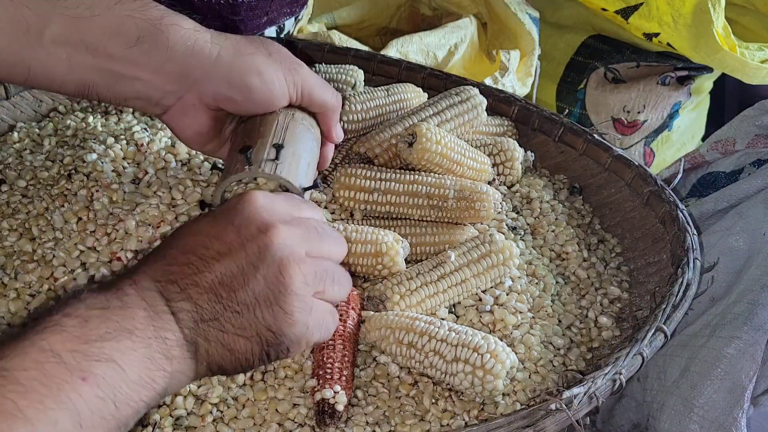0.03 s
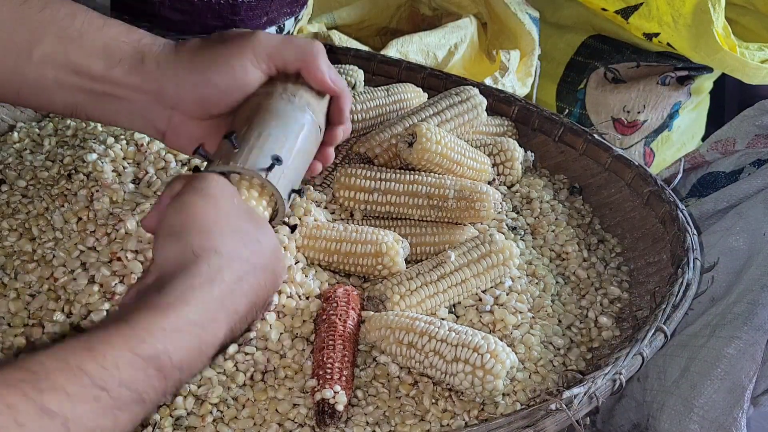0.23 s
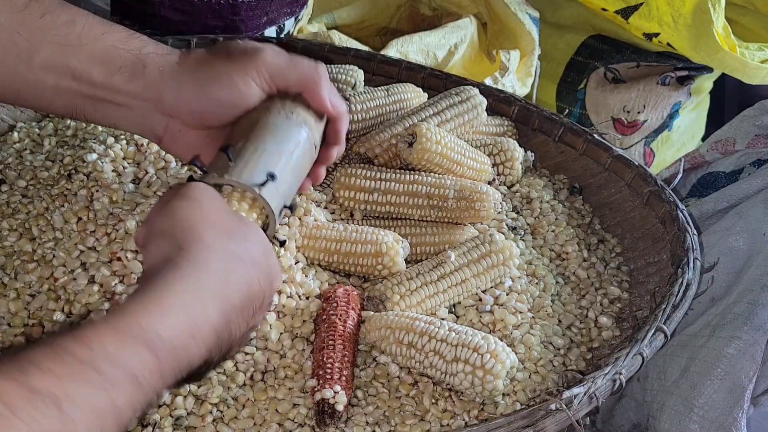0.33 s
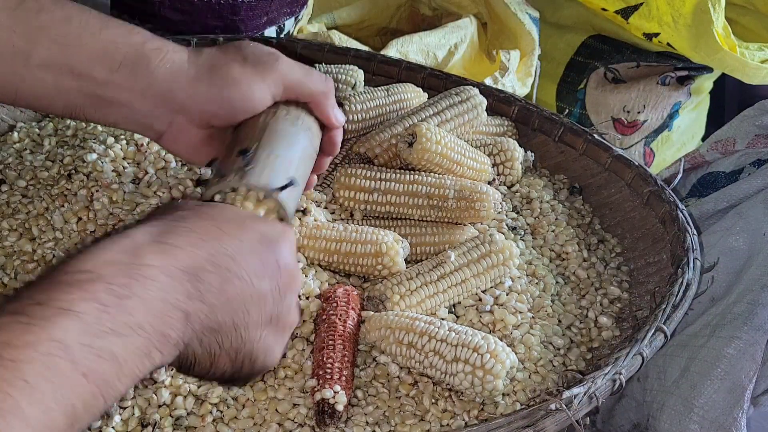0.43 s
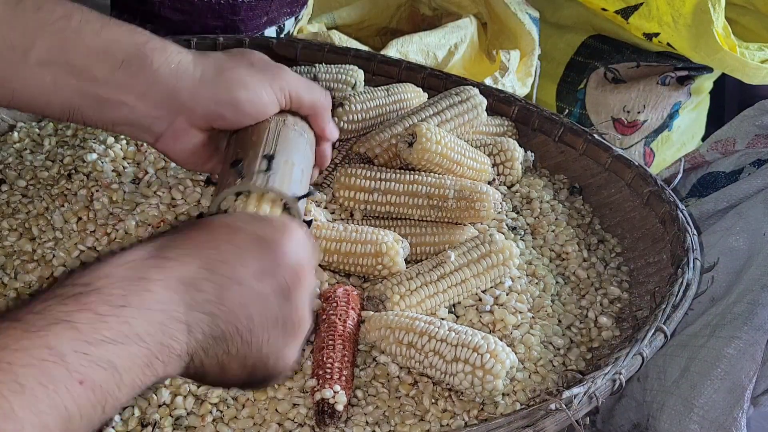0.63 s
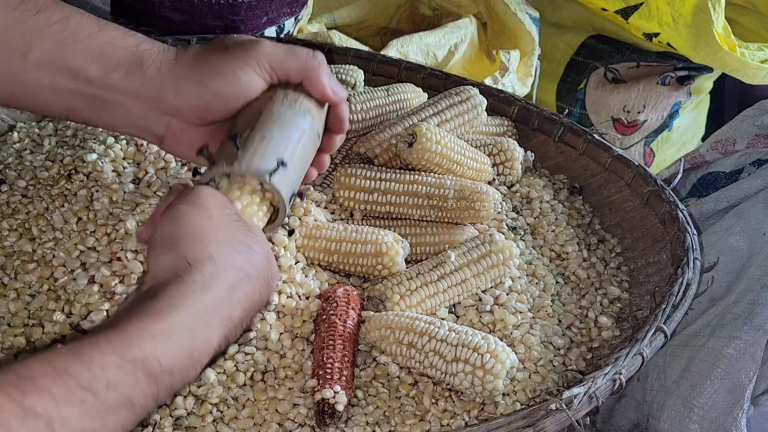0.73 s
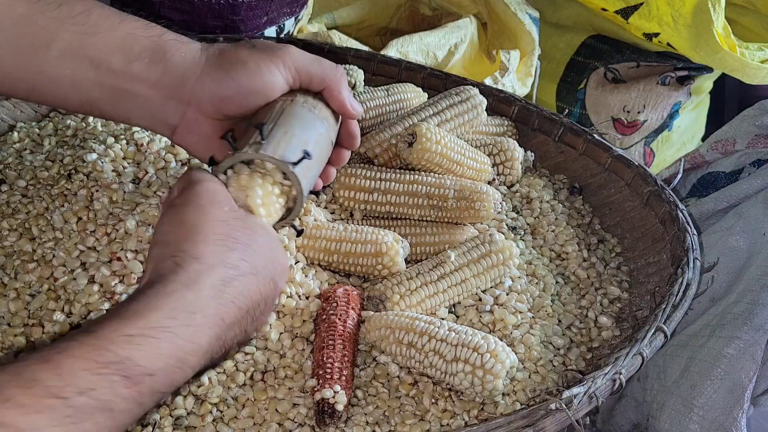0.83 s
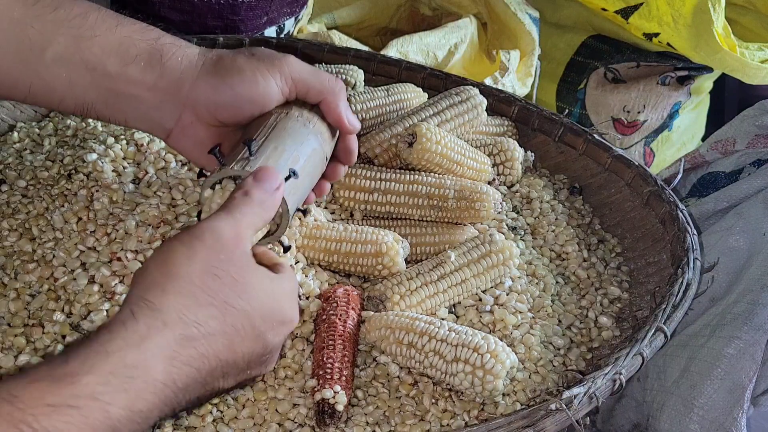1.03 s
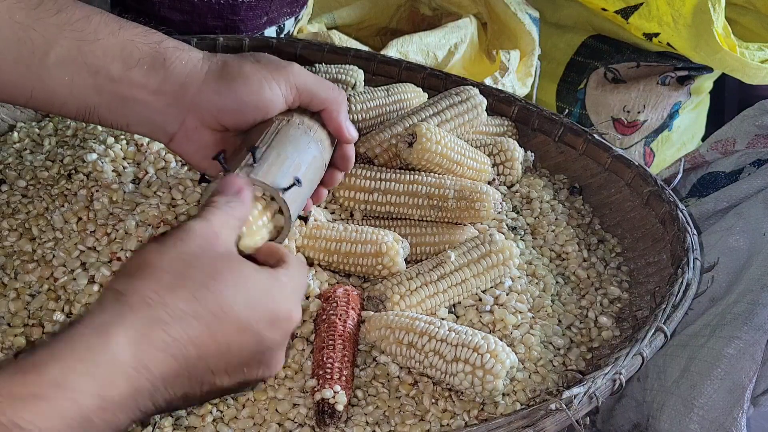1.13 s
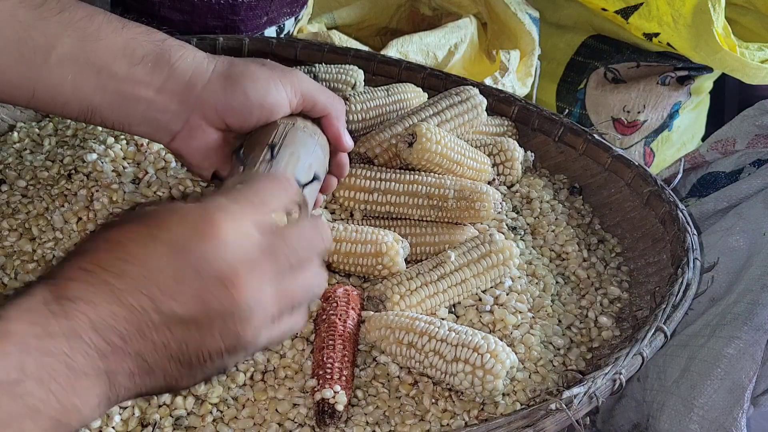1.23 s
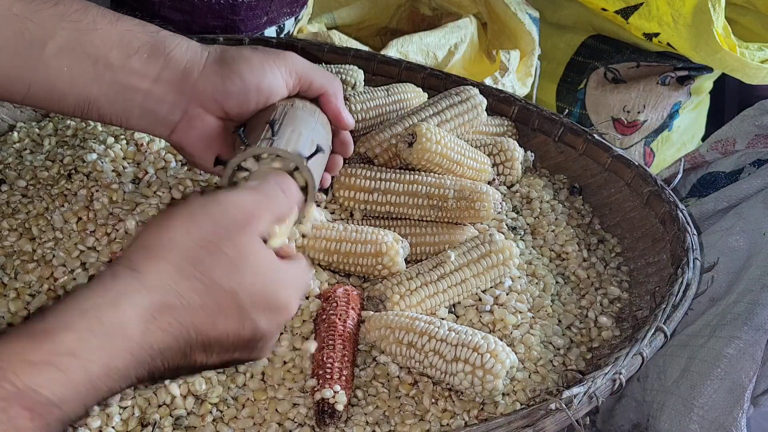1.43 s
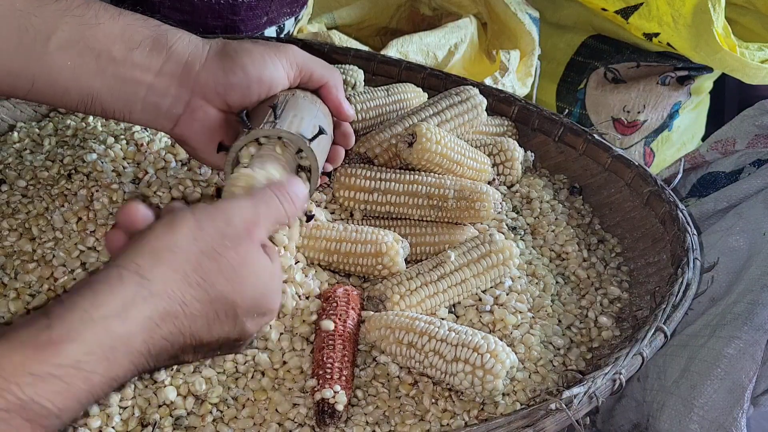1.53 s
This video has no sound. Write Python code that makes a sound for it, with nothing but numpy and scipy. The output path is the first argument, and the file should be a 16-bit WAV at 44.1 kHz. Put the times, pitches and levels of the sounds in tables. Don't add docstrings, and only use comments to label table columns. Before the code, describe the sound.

A dried corn cob is twisted in a wooden sheller, kernels cracking, crunching and ticking down outdoors

```python
import sys
import numpy as np
from scipy import signal
from scipy.fft import rfft, irfft, next_fast_len
from scipy.io import wavfile
from scipy.ndimage import uniform_filter1d, map_coordinates

SR = 44100
rng = np.random.default_rng(int(sys.argv[2]) if len(sys.argv) > 2 else 0)


def master(y):
    cut = np.clip(np.atleast_2d(y).T, -1, 1)
    pcm = np.round(cut * 32767)
    wavfile.write(sys.argv[1], SR, pcm.astype(np.int16))


def field_ratio(decibels):
    return 10 ** (np.asarray(decibels, dtype=float) / 20)


N = 70560

# [Hz, dB per Hz]
TRAFFIC_SPECTRUM = [(15, -39.5), (25, -14.5), (92, -5), (134, -11.5), (173, -17.5), (237, -20), (315, -16),
                    (591, -23.5), (900, -27.5), (1170, -73), (1980, -120)]
# [Hz, Hz, dB]
ENGINE_BANDS = [(83.4, 10.5, 0.5), (105.1, 9.5, -0.5), (176, 33, -10.5), (335.7, 49, -17.5)]
# [Hz, dB per Hz]
AIR_SPECTRUM = [(500, -24.5), (800, -12), (1800, -9.5), (4000, -21.5), (8000, -36), (12000, -33),
                (16000, -37)]
RUMBLE_DB, DRONE_DB, AIR_DB = -51.5, -52.5, -64
HUM_HZ, HUM_DB = 84, -56

# [Hz, s]
YARD_DECAY = [(300, 0.11), (3000, 0.14), (12000, 0.092)]
YARD_DB = -12.5

# [s, dB, dB added per higher mode]
KNOCKS = [
    (0.0243, -40.5, -0.5),
    (0.1234, -42, 4),
    (.2005, -28.5, -14),
    (0.2248, -50, 10),
    (.4708, -35, 5),
    (0.6702, -45, 6),
    (0.7094, -48.5, 7),
    (1.395, -39.5, -12.5),
]
# [Hz, dB, s]
TUBE_MODES = [(352.3, 1.5, 0.077), (814, 2, 0.03), (1164, 1.5, 0.022), (1600, -4.5, 0.034)]

# [Hz, dB per Hz]
CRUNCH_SPECTRUM = [(120, -36.5), (340, -17), (570, -15.5), (1150, -10), (2200, -8), (3000, -3), (5500, -3),
                   (8500, -7.5), (10500, -14.5), (15500, -19.5)]
# [s, dB, dB]
TWISTS = [
    [(0, -46, 8.5), (.018, -48.5, 1), (.03, -36.5, 2.5), (.055, -51, -6), (.085, -60.5, 5),
     (.097, -46.5, 10), (.135, -46, 9), (.15, -37, 10.5), (.168, -40, 0)],
    [(.181, -30, 7), (.197, -33.5, 6), (.212, -32.5, 10), (.228, -25.5, 6.5), (.25, -39.5, 2.5),
     (.31, -61.5, 10.5), (.338, -59, -10), (.36, -50.5, -11), (.44, -49.5, -3.5)],
    [(.466, -39.5, -3), (.473, -28.5, 5.5), (.493, -38, -5), (.514, -55.5, 17.5), (.58, -68.5, 12),
     (.605, -66, -13), (.62, -52, 0), (.66, -48.5, -5)],
    [(.676, -36, 3), (.701, -36.5, -5), (.715, -29, 8.5), (.737, -44, -1), (.785, -72, 13),
     (.87, -63.5, -5.5), (.92, -68, -7.5), (1.08, -73, -2.5)],
]
# [s, dB, dB]
SHIFTS = [
    [(1.117, -56.5, 7.5), (1.125, -44.5, -7), (1.166, -71.5, 17), (1.176, -45, -2.5), (1.208, -58.5, 18),
     (1.22, -46.5, 6), (1.25, -48, 4.5), (1.296, -69, 8), (1.322, -66, 4)],
    [(1.335, -58.5, 6.5), (1.39, -47.5, 11.5), (1.412, -56, 6), (1.438, -51, 14), (1.492, -51, 6),
     (1.54, -66.5, 2), (1.558, -65, 7), (1.58, -49.5, 10), (1.6, -60, 20)],
]
GRAINS_PER_S, GRAIN_SPREAD_DB, GRAIN_HZ, GRAIN_CYCLES = 2800, 4, 3850, 1.56
BED_DB, PATCHY_DB, CLUMP_DB = -7, 2.5, 1.46
BRIGHT_HZ, BODY_HZ, BODY_LOSS = 7600, 1820, 0.4

# [s, dB peak, Hz ring, s, dB over ring]
TICKS = [(0.349, -40.5, 1540, 0.0017, -18), (0.369, -34, 2980, 0.0014, -12), (0.396, -41, 1680, 0.00082, 1),
         (.411, -56, 7000, .001, -3), (0.4193, -35, 5330, 0.002, -14), (0.433, -45, 3000, .0012, -8),
         (0.563, -46.5, 8950, .0014, 3), (0.612, -42, 2600, 0.0016, -6), (0.642, -36, 1300, .0012, -7),
         (.865, -52.5, 6500, 0.0011, 0.5), (1.113, -43, 7200, 0.0013, -15),
         (1.1206, -29.5, 4940, 0.0016, -7), (1.172, -35.5, 4580, 0.0036, -18),
         (1.2187, -38, 3400, 0.0036, -7), (1.23, -37.5, 2960, .003, -12), (1.234, -33, 5270, 0.0024, -21),
         (1.336, -39.5, 13300, 0.0014, 2), (1.3752, -46, 1730, 0.0063, -14), (1.377, -42, 12600, .001, -5),
         (1.395, -42, 3600, 0.0034, -7), (1.4045, -37, 13700, 0.00078, 1), (1.426, -43, 8600, 0.0013, -2),
         (1.437, -31, 5170, 0.0018, -1), (1.548, -43.5, 1600, .0015, -10), (1.564, -46, 4000, 0.0016, 3),
         (1.5724, -39, 3000, 0.0021, -11), (1.582, -38, 8900, .0013, -16)]
# [s, dB peak,
# Hz ring, s, dB over ring]
SNAPS = [(0.0224, -29, 5550, .002, -7), (.0243, -32, 807, 0.0042, -0.5),
         (.0262, -28.5, 3370, 0.0016, -10.5), (0.0433, -28, 6600, 0.0023, -9),
         (0.0497, -32, 4000, 0.0013, -4.5), (0.052, -29.5, 5070, 0.0028, -19),
         (0.0944, -18, 7400, 0.0019, -9), (0.1005, -25, 7200, 0.0012, -12),
         (0.104, -33, 3200, 0.0014, -18.5), (.1236, -26, 1115, 0.0018, -12.5),
         (0.1241, -27, 3000, 0.0024, -9), (0.1421, -26, 1450, 0.0023, -1.5),
         (.1495, -27, 3150, .0015, -3), (0.155, -29.5, 5000, 0.0027, -12),
         (.177, -25, 2900, .004, -3), (.182, -23, 6500, 0.0012, -10), (0.1873, -25, 1200, .004, -6),
         (.2004, -8, 5450, 0.001, -1), (.2023, -10.5, 3000, 0.0006, 13),
         (0.2017, -7, 5300, 0.001, -11.5), (0.2035, -14, 5660, 0.0014, -8),
         (.2105, -17, 5500, 0.0012, -2.5), (0.217, -24, 1700, 0.0036, -11),
         (0.2214, -18, 1500, 0.0029, -7.5), (.2244, -21.5, 2000, 0.0019, -8.5),
         (0.2247, -21.5, 4200, 0.00079, -14.5), (0.2285, -14.5, 5000, .002, -0.5),
         (0.233, -23.5, 1200, 0.0017, -7),
         (0.452, -32, 5400, 0.0052, -3), (0.4707, -9.5, 2880, 0.0013, -12),
               (.4712, -27, 878, 0.0044, -5), (0.472, -20, 7160, 0.0018, -7),
               (0.4766, -20.5, 5000, 0.0022, -18), (0.478, -37, 3040, 0.0013, 4),
               (0.482, -17, 5140, 0.0025, -29), (0.488, -18.5, 3500, 0.0013, 0),
               (0.4942, -19.5, 6610, 0.0024, -7), (0.516, -44, 5000, 0.0023, -9),
               (0.6673, -31, 2900, 0.0012, -1.5), (.671, -19, 4250, 0.0018, -4),
               (.6714, -20.5, 5590, 0.0016, -14.5), (0.6726, -18, 8480, 0.0014, -5.5),
               (0.6748, -32, 3260, 0.003, -6), (0.686, -45, 1480, 0.0014, -4),
               (0.6879, -19.5, 3000, 0.0014, -3), (0.7067, -32, 4500, 0.0026, -9.5),
               (.7093, -18, 863, .002, 3), (.7095, -22, 1540, 0.0022, -4), (0.7117, -18, 5200, .0016, -29),
               (.7175, -27, 4800, 0.0036, -16), (0.725, -27.5, 3320, 0.0015, -9),
               (0.7326, -24, 6800, 0.0012, -12)]
SNAP_DB, SNAP_Q = -4.5, 11
LEAD_IN_DB, LEAD_IN_S = -15, 0.0011
AFTER_DB, AFTER_S = -11, 0.031
RING_ROUGH = 0.49
RING_SPREAD = 0.51
RISE = 0.12
RATTLE_CRACK_DB = 1

# [Hz, 0 to 1]
LIKENESS = [(60, 0.93), (160, 1), (300, 0.83), (1500, 0.21), (5000, 0.52), (12000, 0.22)]
# [Hz, radians]
LEFT_LEAD = [(160, 0.2), (300, 1.52), (700, 1.76), (3000, 2.58), (8000, 2.04), (15000, 1.5)]
LEFT_DB = 0.48
NEAR_CUT_HZ = 245
TOP_HZ = 16150


def unit(x):
    return x / np.sqrt(np.mean(x ** 2) + 1e-20)


def along(points, hz):
    f, v = np.transpose(points)
    return np.interp(np.log(hz + 1), np.log(f + 1), v)


def wobble(rate):
    knots = rng.standard_normal(int(N * rate / SR) + 4)
    return map_coordinates(knots, [np.arange(N) * rate / SR])


def filtered(x, response):
    m = next_fast_len(N + SR // 2)
    return irfft(rfft(x, m) * response(np.fft.rfftfreq(m, 1 / SR)), m)[..., :N]


def peak(f, hz, width):
    return 1j * f * width / (hz * hz - f * f + 1j * f * width)


def patchy(x, db):
    z = signal.stft(x, nperseg=256)[2]
    field = uniform_filter1d(rng.standard_normal(z.shape[1:]), size=7, axis=0)
    field = uniform_filter1d(field, size=5, axis=1)
    return signal.istft(z * field_ratio(db * unit(field)), nperseg=256)[1][:, :N]


def pair(a, b):
    def shares(hz):
        angle = np.arccos(np.clip(along(LIKENESS, hz), -1, 1)) / 2
        return np.array([np.cos(angle), np.sin(angle)])

    mid, side = filtered(np.array([a, b]), shares)
    return np.array([mid + side, mid - side])


def shaped_noise(response):
    white = rfft(rng.standard_normal((2, N)))
    return unit(irfft(white * response(np.fft.rfftfreq(N, 1 / SR)), N))


def outdoors():
    rumble = shaped_noise(lambda hz: field_ratio(along(TRAFFIC_SPECTRUM, hz)))
    drone = shaped_noise(lambda f: sum(field_ratio(db) * peak(f, hz, w) ** 2 for hz, w, db in ENGINE_BANDS))
    air = shaped_noise(lambda hz: field_ratio(along(AIR_SPECTRUM, hz))) * field_ratio(wobble(12.7) / 2)
    hum = np.sin(2 * np.pi * np.cumsum(HUM_HZ + 5 * wobble(5.97)) / SR)
    hum = hum * field_ratio(HUM_DB + 1.6 * wobble(10)) * np.array([[1], [0]])
    return hum + field_ratio(RUMBLE_DB) * rumble + field_ratio(DRONE_DB) * drone + field_ratio(AIR_DB) * air


def yard(x):
    hz, t, z = signal.stft(rng.standard_normal((2, SR // 3)), SR, nperseg=128)
    decay = field_ratio(-60 * t / along(YARD_DECAY, hz)[:, None])
    tail = signal.istft(z * decay, SR, nperseg=128)[1]
    late = np.pad(x, (90, 0))[None]
    return signal.fftconvolve(late, tail / np.linalg.norm(tail[0]), axes=1)[:, :N]


def knocks():
    out, t = np.zeros((2, N + SR)), np.arange(4410) / SR
    for s, db, tilt_db in KNOCKS:
        start = round(s * SR)
        for k, (hz, mode_db, t60) in enumerate(TUBE_MODES):
            detune = 1 + 0.04 * rng.standard_normal((2, 1))
            ring = np.sin(2 * np.pi * hz * detune * t) * (1 - np.exp(-t / 0.00029))
            decay = field_ratio(db + mode_db + k * tilt_db - 60 * t / t60)
            out[:, start:start + len(t)] += decay * ring
    return out[:, :N]


def grains():
    pool = 3000
    many = int(pool * N / SR)
    u, g = rng.random((many, 3)), rng.standard_normal((many, 2))
    size = field_ratio(-GRAIN_SPREAD_DB * np.log(u[:, 1] + 0.052)) * (u[:, 2] < GRAINS_PER_S / pool)
    hz = np.clip(GRAIN_HZ * np.exp(0.63 * g[:, :1]), 500, 15000)
    k = np.arange(160)
    places = ((u[:, :1] * N).astype(int) + k).ravel()
    decay = np.exp(-hz * k / SR / GRAIN_CYCLES * 2)
    out = []
    for phase in (0, np.pi / 2):
        ring = np.sin(2 * np.pi * hz * k / SR + phase * g[:, 1:] * 2)
        clicks = size[:, None] * ring * decay
        out.append(np.bincount(places, clicks.ravel(), N + 200)[:N])
    return unit(np.array(out))


def crunch():
    s, *columns = np.array([row for stroke in TWISTS + SHIFTS for row in stroke]).T
    level_db, bright_db = [np.interp(np.arange(N) / SR, s, c) for c in columns]
    white = filtered(grains(), lambda hz: 1 / np.sqrt(
        np.exp(-np.log((hz + 1) / GRAIN_HZ) ** 2 / 3.4) + 0.033))
    mix = unit(white) + field_ratio(BED_DB) * rng.standard_normal((2, N))
    full = unit(filtered(patchy(mix, PATCHY_DB), lambda hz: field_ratio(along(CRUNCH_SPECTRUM, hz))))
    top = filtered(full, lambda hz: 1 / (1 + (BRIGHT_HZ / (hz + 1)) ** 4))
    body = filtered(full, lambda hz: 1 / (1 + (hz / BODY_HZ) ** 4))
    coloured = full + (field_ratio(bright_db) - 1) * top + (field_ratio(-BODY_LOSS * bright_db) - 1) * body
    return field_ratio(level_db + CLUMP_DB * wobble(120)) * coloured


def each_unit(x):
    return np.array([unit(row) for row in x])


def snaps():
    early = 441
    out, t = np.zeros((2, N + SR)), (np.arange(4096) - early) / SR
    f, after = np.fft.rfftfreq(len(t), 1 / SR), np.maximum(t, 0)
    broad = field_ratio(0.63 * along(CRUNCH_SPECTRUM, f))
    creak = field_ratio(LEAD_IN_DB) * np.exp(t / LEAD_IN_S)
    around = np.where(t < 0, creak, field_ratio(AFTER_DB - 60 * after / AFTER_S))
    for s, db, hz, length, crack_db in SNAPS + TICKS:
        length = max(length, 3e-4)
        burst = (1 - np.exp(-after / (RISE * length))) * np.exp(-(after / length) ** 3)
        noise, ring = rfft(rng.standard_normal((2, len(t)))), peak(f, hz, hz / SNAP_Q)
        tone = np.sin(2 * np.pi * (hz * after + rng.random((2, 1))))
        tone = tone + RING_ROUGH * unit(irfft(noise * ring))
        ringing = np.array([[1], [RING_SPREAD]]) * each_unit(tone * burst)
        crack = field_ratio(crack_db) * each_unit(irfft(noise * broad) * burst)
        sharp = unit(ringing + crack) * np.sqrt(np.mean(burst ** 2))
        rattle_colour = ring + field_ratio(crack_db + RATTLE_CRACK_DB) * broad
        rattle = unit(irfft(noise * rattle_colour)) * around
        start = round(s * SR)
        out[:, start:start + len(t)] += field_ratio(db + SNAP_DB) * (sharp + rattle)
    return out[:, early:N + early]


def scene():
    near = crunch() + snaps() + knocks()
    near = filtered(near, lambda hz: (1j * hz / (NEAR_CUT_HZ + 1j * hz)) ** 2)
    close = pair(*near) * field_ratio(np.array([[LEFT_DB], [-LEFT_DB]]))
    return close + field_ratio(YARD_DB) * yard(near[0] + near[1]) + pair(*outdoors())


def low_pass(x):
    return signal.sosfilt(signal.butter(12, 16630, fs=SR, output="sos"), x)


def record(dry):
    def phone(hz):
        lead = np.exp(0.5j * along(LEFT_LEAD, hz) * np.array([[1], [-1]]))
        return lead * np.clip((TOP_HZ - hz) / 500, 0, 1) ** 2

    return low_pass(filtered(dry, phone))


dry = scene()
out = record(dry)
master(out)
```